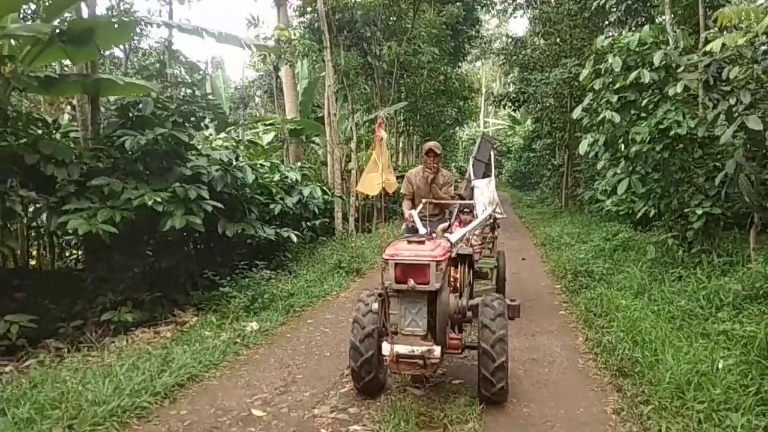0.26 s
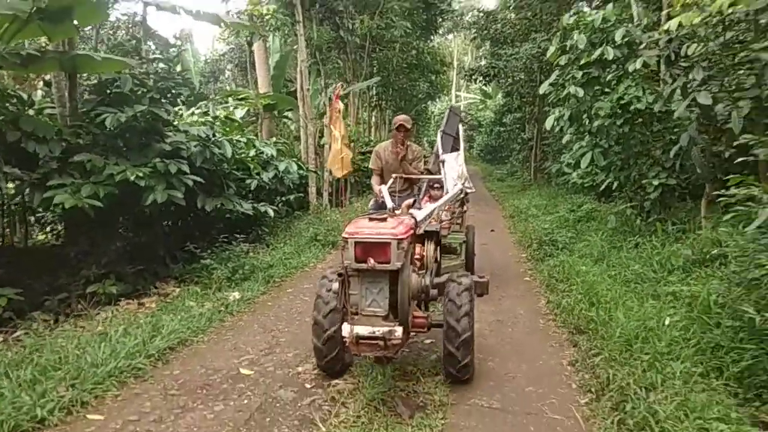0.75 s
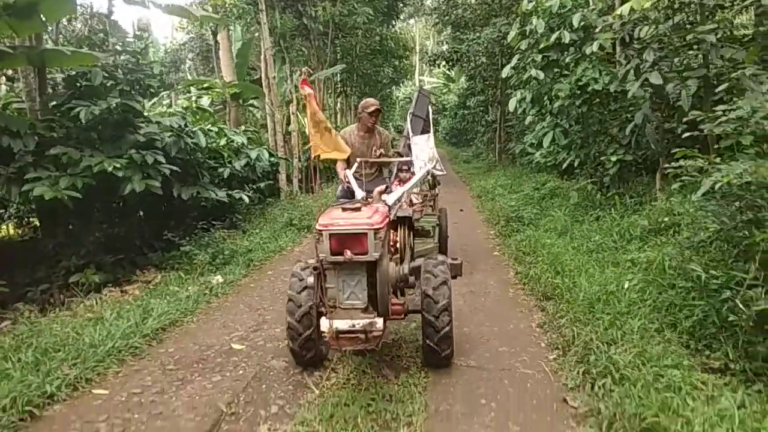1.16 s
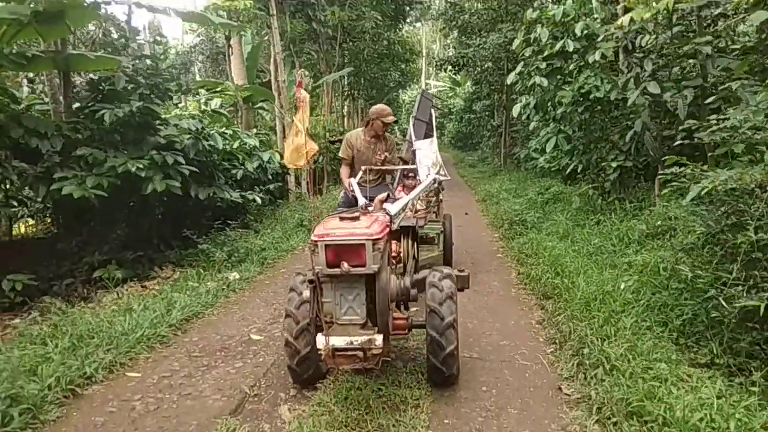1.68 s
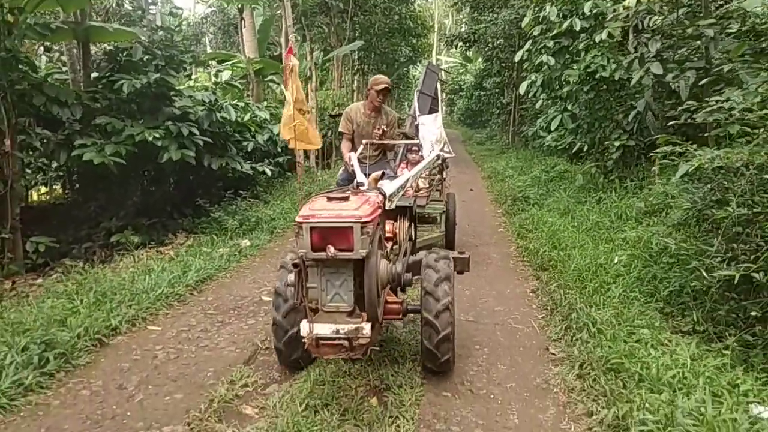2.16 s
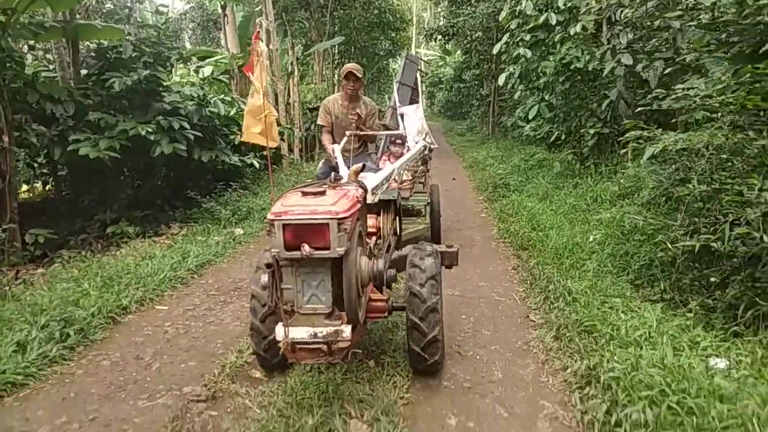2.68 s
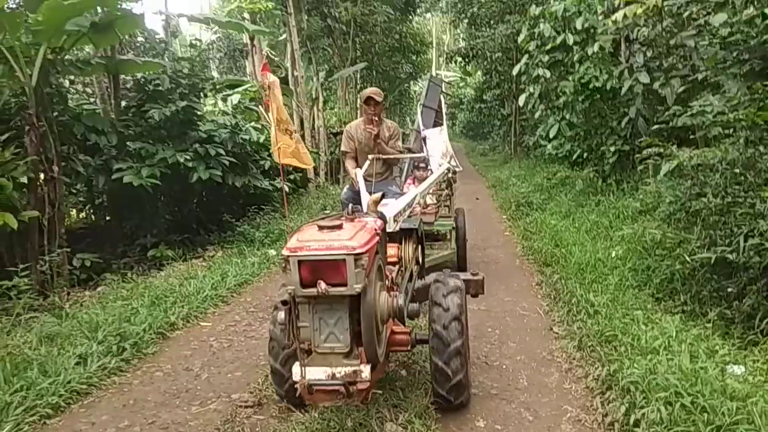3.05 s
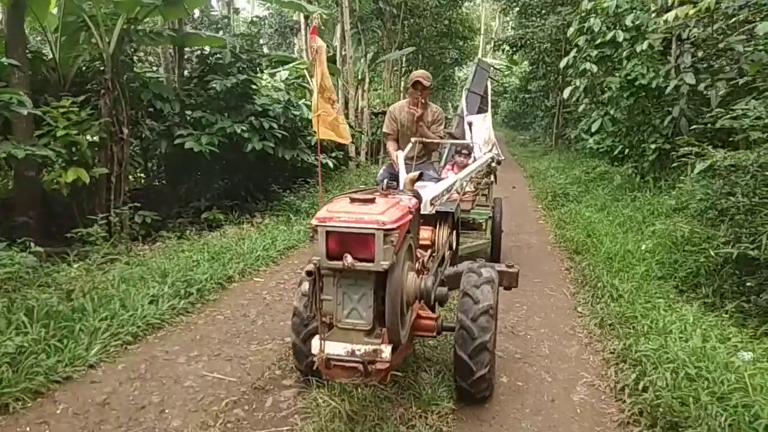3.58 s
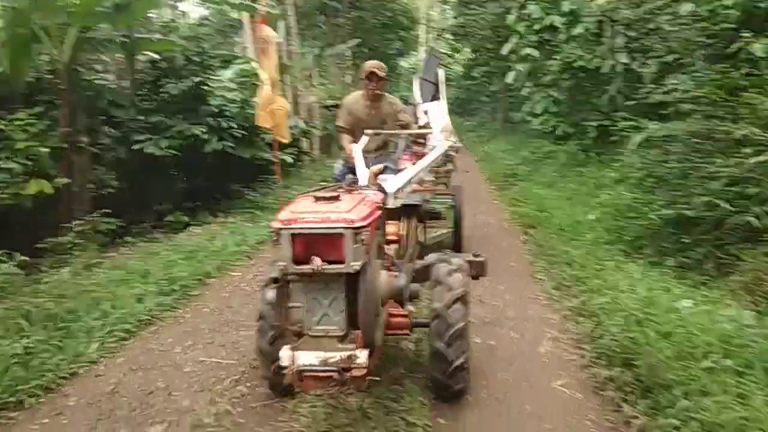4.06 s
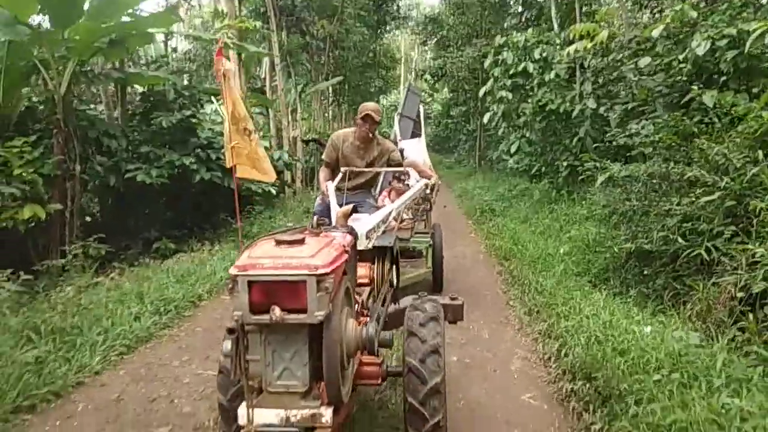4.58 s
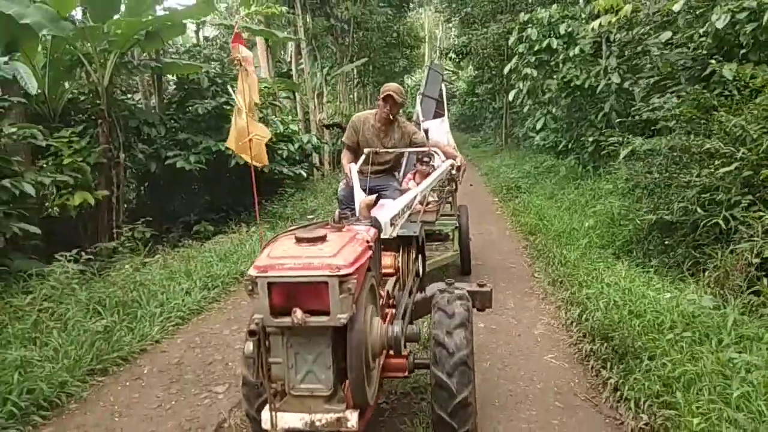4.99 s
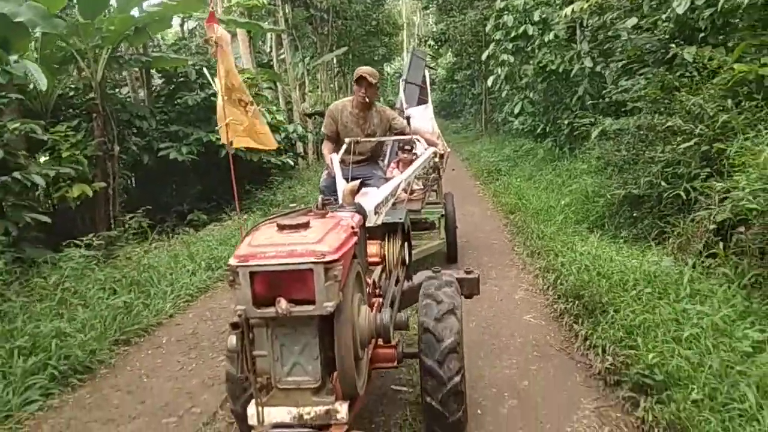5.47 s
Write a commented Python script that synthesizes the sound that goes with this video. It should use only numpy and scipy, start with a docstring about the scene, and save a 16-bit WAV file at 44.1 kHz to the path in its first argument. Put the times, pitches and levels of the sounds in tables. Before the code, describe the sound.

A walk-behind tractor's single-cylinder diesel engine chugs from start to finish, about five and a half seconds, slowly approaching the microphone on a forest path. It fires between four and five times a second, wavering slightly in speed and growing a little louder. Each beat combines a hard, ringing iron knock, a low exhaust thump and a hissing, faintly whistling spit of gas, with hollow intake gulps and light valve ticks between. Gears rustle underneath and loose frame and trailer parts clatter softly. Brief dry hisses, like a slipping belt, flare between about 1 and 2.7 seconds and again around 4.5 seconds. The hitch gives short metal knocks near 1.8 seconds and, most clearly, at 3.5 seconds, then lighter ones around 3.9, 4.5 and 5.1 seconds. The trees add a short, thin echo, and the engine is still running at the end.

```python
"""Diesel tractor on a forest path

A walk-behind tractor with a one-cylinder diesel chugs slowly towards the microphone.
In each engine cycle (two turns of the crank) burning fuel knocks the iron block, the exhaust
thumps and spits gas, the intake gulps air and the valves tick. Gears rustle, loose parts
clatter, a hiss like a slipping belt comes and goes, and the trees scatter a short echo."""
import sys
import numpy as np
from scipy import signal
from scipy.fft import rfft, irfft
from scipy.io import wavfile
from scipy.ndimage import uniform_filter1d, map_coordinates

SR = 44100
rng = np.random.default_rng(int(sys.argv[2]) if len(sys.argv) > 2 else 0)


def unload_audio(sound):
    """Save the sound as a 16-bit wav file, at the path given as the first command line argument."""
    columns = np.transpose(np.atleast_2d(sound))
    # keep every value between -1 and 1, then stretch to whole-number steps
    steps = np.round(np.clip(columns, -1, 1) * 32767)
    wavfile.write(sys.argv[1], SR, steps.astype(np.int16))


N = 252804
T = np.arange(N) / SR

# the engine's speed control wavers as the load changes: time_s, crank_rpm
ENGINE_SPEED = [(0.0, 569.0), (0.48, 544.3), (0.61, 560.5), (1.11, 543.6), (1.37, 532.7), (1.57, 569.2),
                (1.84, 549.6), (2.03, 562.4), (3.41, 569.3), (3.68, 541.8), (4.04, 566.3), (4.35, 543.4),
                (4.51, 567.3), (4.89, 560.9), (5.31, 582.3), (5.73, 566.6)]
# tone of the exhaust hiss and the valve ticks: pitch_hz, level_db (table levels are relative)
HISS_COLOUR = [(500, 1.5), (2500, -6.5), (3500, 1.5), (5200, 8), (6100, -16), (7400, 1), (8200, 1),
               (9300, 7.5), (10800, 8.5), (12000, -1.5), (14000, 0), (15600, -4)]


def undb(db):
    """Turn decibels into a gain."""
    return 10 ** (np.asarray(db) / 20)


def unit(x):
    """Scale a sound to an average (rms) level of 1."""
    return x / np.sqrt(np.mean(x ** 2))


def colour(x, points):
    """Shape the tone of a sound by (pitch_hz, level_db) points."""
    hz, db = np.transpose(points)
    f = np.maximum(np.fft.rfftfreq(x.shape[-1], 1 / SR), 1)
    return irfft(rfft(x) * undb(np.interp(np.log(f), np.log(hz), db)), x.shape[-1])


def diffuse(size=N, alike_hz=1300):
    """Noise from all around: left and right are alike in the bass, unrelated in the treble."""
    likeness = 1 / (1 + (np.fft.rfftfreq(size, 1 / SR) / alike_hz) ** 2)
    mid, side = rfft(rng.standard_normal((2, size))) * np.sqrt([1 + likeness, 1 - likeness])
    return irfft([mid + side, mid - side], size) / np.sqrt(2)


def resonate(x, hz, width):
    """Make a sound ring at one pitch; a narrower width rings longer."""
    return signal.lfilter(*signal.iirpeak(hz, hz / width, fs=SR), x)


def resonate_twice(x, hz, width):
    """Ring twice over, so that a push swells before it fades."""
    return resonate(resonate(x, hz, width), hz, width)


def convolve(x, response):
    """Let every sample of a sound set off a copy of the response."""
    return signal.fftconvolve(np.atleast_2d(x), np.atleast_2d(response), axes=-1)[:, :N]


def clicks(times, sizes):
    """One-sample pushes at the given times."""
    index = np.round(np.ravel(times) * SR).astype(int)
    inside = (index >= 0) & (index < N)
    return np.bincount(index[inside], np.ravel(sizes)[inside], N)


def puff(peak_s, steepness):
    """A shape like gas rushing through a valve: it swells to 1 at peak_s and ebbs away."""
    u = T[:SR // 8] / peak_s
    return (u * np.exp(1 - u)) ** steepness


def fade(ring_s, size=SR // 3):
    """A shape that dies away by 60 dB in ring_s."""
    return np.exp(-np.log(1000) * T[:size] / ring_s)


def nearness(t, start_m=4.61, speed_m_s=0.31, reference_m=5.02):
    """Gain in dB as the tractor draws nearer; 0 at the reference distance."""
    return 20 * np.log10(reference_m / np.maximum(start_m - speed_m_s * t, 1))


def exhaust_openings(first_cycle=.340):
    """Times at which the exhaust valve opens: once in every two turns of the crank."""
    cycles = np.cumsum(np.interp(T, *np.transpose(ENGINE_SPEED))) / (2 * 60 * SR)
    return np.interp(np.arange(first_cycle, cycles[-1]), cycles, T)


OPEN_S = exhaust_openings()
CYCLE_S = np.gradient(OPEN_S)
KNOCK_DB = nearness(OPEN_S) - nearness(OPEN_S[-1])  # each cycle against the nearest one
THUMP_DB = 0.57 * KNOCK_DB  # the bass follows only part of that rise


def each_cycle(place, db, scatter_db=0, jitter_s=0):
    """One push per cycle, `place` cycles after the exhaust opens (negative: before)."""
    late, loud = rng.standard_normal((len(OPEN_S), 2)).T
    return clicks(OPEN_S + place * CYCLE_S + jitter_s * late, undb(db + scatter_db * np.tanh(loud)))


def trees(x, ring_s=0.43, echo_db=-10):
    """Trunks and leaves scatter a thin echo with little bass."""
    # tone of the echo: pitch_hz, level_db
    echo_colour = [(100, -62), (300, 4.5), (800, 3.5), (2500, 1), (3250, 6), (4600, 5.5),
                   (7000, -8), (10000, 4.5), (16000, -45)]
    size = SR // 2
    swell = 1 - np.exp(-T[:size] / 0.0014)
    tail = colour(diffuse(size), echo_colour) * fade(ring_s, size) * swell
    return undb(echo_db) * convolve(x, tail / np.linalg.norm(tail[0]))


def running_gear(flicker_db=1.5, surge_db=2.0):
    """Gears, fan and tyres rustle and a cover buzzes, louder as each firing speeds the flywheel."""
    # tone of the rustle: pitch_hz, level_db
    rustle_colour = [(25, 17), (50, 10), (95, 16), (160, 6.5), (220, 5), (400, -3), (750, 8), (1300, 5),
                     (1900, 3), (2550, 3), (3500, -3), (5200, -5), (6000, -8), (9800, -4), (13000, -6.5),
                     (16000, -15.5)]
    cycles = np.interp(T, OPEN_S, np.arange(len(OPEN_S)))
    flicker = unit(uniform_filter1d(rng.standard_normal(N), SR // 80))
    db = nearness(T) + flicker_db * flicker + surge_db * np.cos(2 * np.pi * (cycles - .2))
    buzz = unit(resonate_twice(diffuse(), 2550, 220)) * undb(nearness(T))
    rustle = unit(colour(diffuse(), rustle_colour))
    return (undb(-41) * rustle + undb(-57) * buzz) * undb(db)


def belt(rise_s=0.0023):
    """A dry hiss flares up now and then and dies away, like a slipping belt."""
    # bursts of hiss: start_s, level_db, decay_s
    flares = [(.96, -50, 0.077), (1.368, -48, 0.1), (1.623, -40, 0.065), (2.013, -42, 0.051),
              (2.125, -46, 0.048), (2.473, -40.5, 0.067), (2.628, -47.5, 0.12), (4.372, -36.5, 0.014),
              (4.501, -42.5, 0.023), (4.648, -42.5, 0.04)]
    # their tone: pitch_hz, level_db
    flare_colour = [(2000, -1), (5000, -1.5), (6200, -4), (8000, -4), (9500, 5), (11000, -1.5), (13500, -2),
                    (16000, -16)]
    loudness = 0
    for start_s, db, decay_s in flares:
        age = np.maximum(T - start_s, 0)
        loudness += undb(db) * (1 - np.exp(-age / rise_s)) * np.exp(-age / decay_s)
    return undb(9.5) * loudness * unit(colour(diffuse(), flare_colour))


def hitch():
    """A part of the hitch strikes as the wheels meet a bump."""
    # knocks: start_s, level_db, pitch_hz, width_hz, ring_s
    knocks = [(1.793, -28.5, 2650, 1180, .06), (3.497, -24.5, 980, 886, 0.06),
              (3.883, -36, 8420, 5020, .04), (4.453, -34, 2540, 600, 0.063), (5.115, -34, 1150, 202, 0.043)]
    out = 0
    for start_s, db, hz, width, ring_s in knocks:
        loudness = convolve(clicks(start_s, undb(db)), fade(ring_s))
        out += loudness * unit(resonate_twice(diffuse(), hz, width))
    return out


def chassis(count=170, centre_hz=800, spread_octaves=0.417, scatter_db=2, ring_s=.05):
    """Loose frame and trailer parts clatter, most after each firing, each at its own pitch."""
    size = SR // 8
    out = np.zeros((2, N + SR))
    shape = fade(ring_s, size) * (1 - fade(.008, size))
    times = rng.choice(OPEN_S, count) + rng.gamma(2, .04, count) - .04
    for start_s, (pitch, loud, side) in zip(times, rng.standard_normal((count, 3))):
        hz = centre_hz * 2 ** (spread_octaves * pitch)
        clank = shape * np.sin(2 * np.pi * hz * T[:size] + .2 * side * np.array([[1], [-1]]))
        first = min(int(start_s * SR), N)
        out[:, first:first + size] += undb(scatter_db * np.tanh(loud) + nearness(start_s)) * clank
    return undb(-51.5) * unit(out[:, :N])


def valve_ticks():
    """The valve gear ticks brightly as the inlet valve shuts."""
    shut = each_cycle(.547, .5 * KNOCK_DB, scatter_db=1.5, jitter_s=.001)
    loudness = convolve(shut, puff(.008, 3))
    return undb(-56.5) * unit(loudness * colour(diffuse(), HISS_COLOUR))


def intake():
    """The piston gulps air in two surges, with a hollow rasp; the shutting valve rings the pipe."""
    # ringing air in the air cleaner and pipe: pitch_hz, width_hz, level_db
    pipe_tones = [(119.2, 5, -2), (176.4, 60, -1), (343, 107, -1)]
    first = each_cycle(.298, 0, scatter_db=.8, jitter_s=.0005)
    second = each_cycle(.333, 0, scatter_db=.8, jitter_s=.0005)
    gulp = convolve(first, puff(.0022, 3.5)) + undb(-1) * convolve(second, puff(.0025, 3.5))
    pipe = sum(undb(db) * resonate(gulp, hz, width) for hz, width, db in pipe_tones)
    suck = each_cycle(.280, 0, scatter_db=1.2, jitter_s=.0005)
    can = resonate_twice(suck, 279.5, 47)  # the air cleaner's can swells and dies in a few swings
    shut = each_cycle(.565, 0.14 * THUMP_DB, scatter_db=1.5, jitter_s=0.0016)
    hum = resonate(convolve(shut, puff(0.0038, 1.65)), 158.55, 6.26)
    rasp = convolve(each_cycle(.285, 0), puff(.0028, 2.2)) * resonate_twice(diffuse(), 766, 280)
    return (undb(-38) * unit(pipe) + undb(-46.5) * unit(can)
            + undb(-45.5) * unit(hum) + undb(-50.5) * unit(rasp))


def piston_slap(lean_left_db=3.5):
    """Just after the fuel lights, the piston hits the cylinder wall: one hard, bright clack."""
    # ringing of the wall: pitch_hz, width_hz, level_db
    wall_tones = [(1400, 120, 1.5), (2590, 285, 2), (2750, 410, 7)]
    blow = each_cycle(-.188, KNOCK_DB, scatter_db=1.5, jitter_s=.0005)
    ring = sum(undb(db) * hz / width * resonate_twice(blow, hz, width) for hz, width, db in wall_tones)
    return undb(-51) * unit(ring) * undb([[lean_left_db], [-lean_left_db]])


def engine_block(contacts=5, stray_knocks=90):
    """Blows, each a quick rattle of contacts, and stray knocks of loose parts ring the iron."""
    # blows from firing, piston, gears and valves: place_cycles, level_db, dull_above_hz, rattle_s
    blows = [(-.214, 4.5, 840, 0.00044), (-.182, -3.5, 1500, 0.002), (-.152, 1, 1290, 0.00071),
             (-.073, -3, 1190, .004), (0.205, -12.5, 900, 0.0037), (0.415, -6, 1102, 0.0055),
             (0.567, -9, 4500, 0.0035)]
    # ringing of block, tank and covers: pitch_hz, level_db, ring_s
    iron_tones = [(369, -11.5, 0.064), (443, -11.5, 0.13), (494, -6.5, 0.058), (650, -60, 0.033),
                  (695, -2, 0.031), (766, -11, 0.14), (843, -19, 0.1), (1020, -36, 0.035),
                  (1140, -12, 0.095), (1360, -22, 0.11), (1343, 2, 0.015), (1440, 3, 0.041),
                  (1519, 1.5, 0.045), (1790, 2, 0.027), (2270, 3.5, 0.012), (2660, -27, 0.054),
                  (2680, 8.5, 0.0078), (2735, -7.5, 0.025), (3210, 1.5, 0.017)]
    force = 0
    for place, db, dull_hz, rattle_s in blows:
        late, size = rng.standard_normal((len(OPEN_S), 2, contacts)).transpose(1, 0, 2)
        times = (OPEN_S + place * CYCLE_S)[:, None] + rattle_s * np.abs(late)
        size = size / np.linalg.norm(size, axis=1, keepdims=True) * undb(db + KNOCK_DB)[:, None]
        force += signal.lfilter(*signal.butter(1, dull_hz, fs=SR), clicks(times, size))
    when, strength = rng.random((stray_knocks, 2)).T
    stray_s = when * N / SR
    force += undb(-24) * clicks(stray_s, strength ** 2 * undb(nearness(stray_s)))
    ring = 0
    for k, (hz, db, ring_s) in enumerate(iron_tones):
        # neighbouring tones go to opposite sides; higher ones put left and right more out of step
        phase = k * np.pi / 2 + (-1) ** k * hz / 4000 * np.array([[1], [-1]])
        ring += undb(db) * fade(ring_s) * np.sin(2 * np.pi * hz * T[:SR // 3] + phase)
    return undb(-42.5) * unit(convolve(force, ring))


def combustion():
    """The fuel lights all at once: the jump in pressure clacks the case, then all the iron rings."""
    # brief bending of the crankcase: pitch_hz, width_hz, level_db
    case_tones = [(682, 350, 1), (1270, 300, -7.5)]
    # dense ringing of the iron: pitch_hz, level_db
    crack_colour = [(300, -0.5), (700, 4), (1400, 13), (1950, 5), (2350, 5), (2750, 11.5), (3100, -8),
                    (3500, 1.5), (4600, -8.5), (6000, -11.5), (10000, -12.5), (16000, -14)]
    jump = each_cycle(-.216, KNOCK_DB, scatter_db=1, jitter_s=.0004)
    clack = sum(undb(db) * hz / width * resonate_twice(jump, hz, 1.5 * width)
                for hz, width, db in case_tones)
    firing = each_cycle(-.209, KNOCK_DB, jitter_s=.0006)
    loudness = convolve(firing, puff(.0054, 3) + undb(-14) * puff(.014, 1.2))
    crack = loudness * colour(diffuse(alike_hz=1530), crack_colour)
    return undb(-48.5) * unit(clack) + undb(-43.5) * unit(crack)


def exhaust_spit(pitch_wander=0.018, db_per_rpm=0.1166):
    """The jet of gas whistles and hisses, harder when the engine runs faster. Gives (whistle, hiss)."""
    # whistles of the jet: pitch_hz, width_hz, level_db
    jet_tones = [(1106, 74, -1.5), (2110, 67, -3), (3180, 165, 8.5), (3815, 570, -9.5), (4562, 190, 1),
                 (5110, 470, -11.5), (7330, 170, -8), (8640, 170, -4), (9900, 350, -12.5)]
    # puffs harder or softer than the rest: time_s, gas_db, low_whistle_db, high_whistle_db
    odd_puffs = [(.29, -1, -10, -4), (.51, -0.5, 0.5, 4.5), (.73, 2.5, -13, -6), (.94, 4.5, 5.5, 6),
                 (1.16, -5.5, -6, 2), (1.38, 4.5, 6.5, 1), (1.6, -0.5, 5.5, 0), (2.03, 1, 4.5, 8.5),
                 (2.24, -2.5, -3.5, 2), (2.46, -0.5, 1.5, 3), (2.67, 1, 5, -0.5), (3.52, 1, -6, -5),
                 (3.74, 4, 4, 6.5), (4.17, 0, 5.5, -6.5), (4.6, 1, 4.5, -0.5), (5.02, -0.5, 7, 0),
                 (5.23, -2.5, -10, -5), (5.44, -2, -4.5, 5), (5.65, -1, 1, 5.5)]
    odd = np.array(odd_puffs)
    in_cycle = np.abs(OPEN_S - odd[:, :1]) < CYCLE_S / 2
    rpm = np.interp(OPEN_S, *np.transpose(ENGINE_SPEED))
    usual_db = KNOCK_DB + db_per_rpm * (rpm - rpm.mean())
    gas_db, low_db, high_db = usual_db + odd[:, 1:].T @ in_cycle
    cycle = np.searchsorted(OPEN_S[1:] - CYCLE_S[1:] / 4, T)
    whistle = 0
    for hz, width, db in jet_tones:
        puff_db = low_db if 2800 < hz < 3550 else high_db if 3550 < hz < 5500 else gas_db
        delay_s = 0.3 / width  # narrow whistles start later
        pushes = each_cycle(.003 + delay_s / CYCLE_S, db + puff_db, scatter_db=1.2)
        loudness = convolve(pushes, puff(.0042, 2) + undb(-22) * puff(.011, 1.2))
        tone = unit(resonate_twice(diffuse(alike_hz=5660), hz, width))
        # the pitch shifts a little from puff to puff
        pace = 1 + pitch_wander * np.tanh(rng.standard_normal(len(OPEN_S)))[cycle]
        tone = np.array([map_coordinates(side, [np.cumsum(pace)], mode="mirror") for side in tone])
        # a whistle can only grow so strong, so it is steadier than plain noise
        strength = np.sqrt(uniform_filter1d(tone ** 2, SR // 200) + .06)
        whistle += loudness * tone / strength
    release = each_cycle(.011, gas_db, scatter_db=.8, jitter_s=.0002)
    rush = convolve(release, puff(.0048, 2.2) + undb(-16) * puff(.013, .8))
    eddies = unit(uniform_filter1d(rng.standard_normal(N), SR // 1500))
    hiss = rush * undb(3 * np.tanh(eddies)) * colour(diffuse(), HISS_COLOUR)
    return undb(-37.5) * unit(whistle), undb(-41) * unit(hiss)


def exhaust_thump():
    """Each puff and the suction after it swing the air in the silencer."""
    # ringing of that air, neighbours swinging opposite ways: pitch_hz, width_hz, level_db
    silencer_tones = [(66.3, 65.5, -6), (99.34, 9.6, -0.6), (135, 19, -18.5)]
    push = convolve(each_cycle(0, THUMP_DB, scatter_db=.8), puff(.0024, 3))
    suction = convolve(each_cycle(.026, THUMP_DB - 7), puff(.0016, 3))
    return undb(-0.9) * sum((-1) ** k * undb(db) * resonate(push - suction, hz, width)
                            for k, (hz, width, db) in enumerate(silencer_tones))


def scene():
    """The tractor among the trees; the exhaust's whistle is nearly dry, its hiss echoes a bit less."""
    machine = (combustion() + piston_slap() + engine_block() + exhaust_thump()
               + intake() + valve_ticks() + chassis() + hitch())
    whistle, hiss = exhaust_spit()
    echo = trees(machine + undb(-10) * whistle + undb(-2) * hiss)
    return machine + whistle + hiss + echo + running_gear() + belt()


def record(dry, top_hz=16000):
    """The sound reaches the microphone's left side later than its right; the top treble is cut."""
    # shift of left against right, negative is later: pitch_hz, phase_radians
    left_shift = [(0, 0), (250, -.15), (1460, -1.15), (1980, -2), (2450, -.3), (2850, -.9), (3190, -4),
                  (4390, -6.5), (5940, -9), (7150, -11.5), (8440, -20.5), (9820, -18), (10500, -21.5),
                  (14000, -28), (15700, -39)]
    phase = np.interp(np.fft.rfftfreq(N, 1 / SR), *np.transpose(left_shift))
    left = irfft(rfft(dry[0]) * np.exp(1j * phase), N)
    treble_cut = signal.ellip(10, .2, 80, top_hz, fs=SR, output="sos")
    return signal.sosfilt(treble_cut, [left, dry[1]])


dry = scene()
out = record(dry)
unload_audio(out)
```